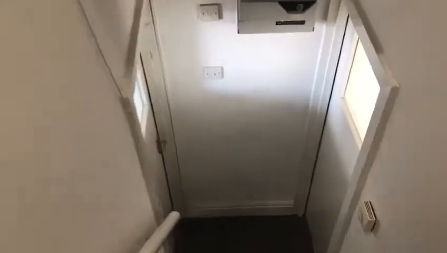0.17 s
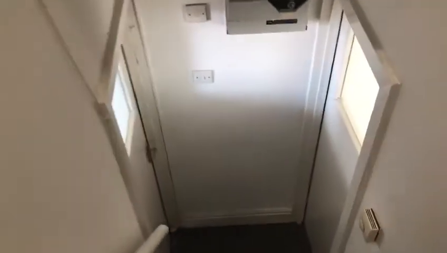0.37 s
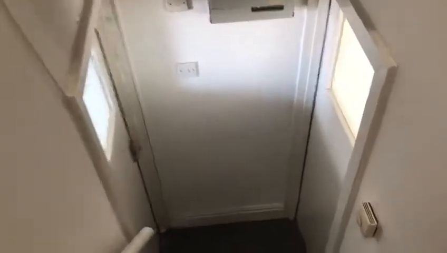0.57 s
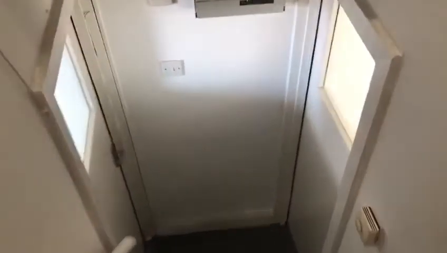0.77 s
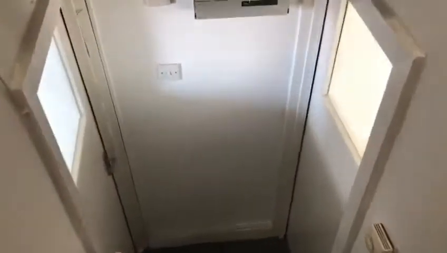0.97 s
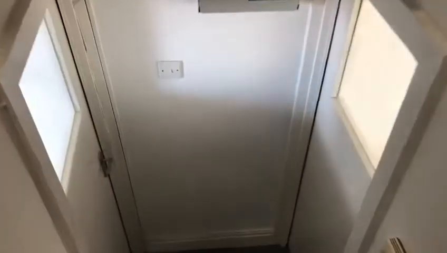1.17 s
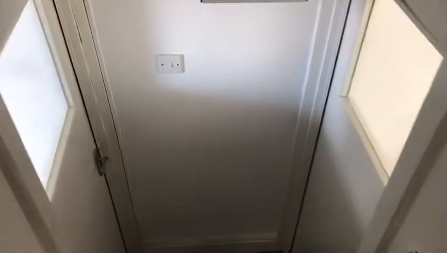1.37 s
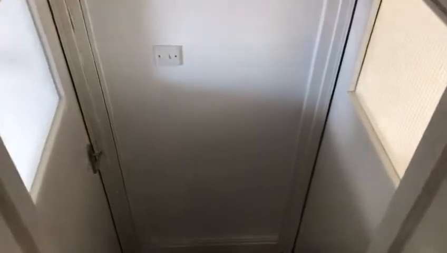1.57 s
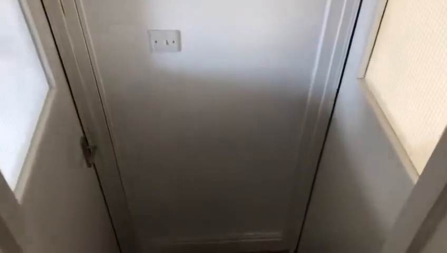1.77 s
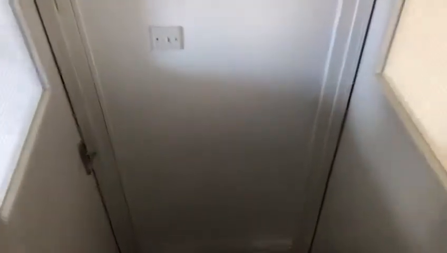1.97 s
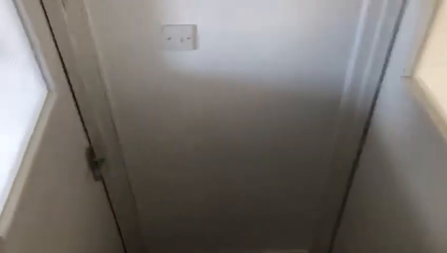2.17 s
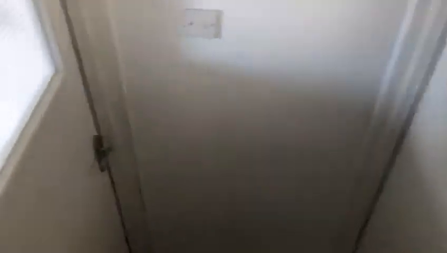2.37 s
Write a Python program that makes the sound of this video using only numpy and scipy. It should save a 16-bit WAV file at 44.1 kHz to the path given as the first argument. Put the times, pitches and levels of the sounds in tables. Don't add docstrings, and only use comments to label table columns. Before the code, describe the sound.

Someone walks down carpeted wooden stairs, dull uneven thuds and snapping treads in a tight stairwell

```python
import sys
import numpy as np
from scipy import signal
from scipy.fft import rfft, irfft
from scipy.io import wavfile
from scipy.ndimage import uniform_filter1d

SR = 44100
rng = np.random.default_rng(int(sys.argv[2]) if len(sys.argv) > 2 else 0)


def attenuation_scalar(level_db):
    decades = np.asarray(level_db, float) / 20
    return 10 ** decades


def transcribe(signal):
    frames = np.atleast_2d(signal).T
    limited = np.clip(frames, -1, 1)
    pcm = np.round(limited * 32767).astype(np.int16)
    wavfile.write(sys.argv[1], SR, pcm)


N = 106325

# (time [s], peak [dB], tread pitch [Hz],
# ring t60 [s])
TREAD_THUDS = [(0.136, -35.5, 247, 0.04), (0.145, -33, 239, 0.07), (0.17, -47, 199, 0.1),
               (0.196, -23.5, 114, 0.04), (0.215, -33, 198, 0.061), (0.2643, -18.5, 253, 0.053),
               (0.2769, -19, 213, 0.086), (0.499, -37.5, 216, 0.086), (0.742, -29.5, 306, 0.063),
               (0.75, -27.5, 221, 0.049), (0.819, -31, 144, 0.058), (0.886, -38.5, 170, 0.097),
               (1.222, -33.5, 161, 0.27), (1.319, -29, 143, 0.2), (1.371, -36, 170, 0.08),
               (1.792, -26, 295, 0.05), (1.842, -30, 158, 0.23), (1.966, -23, 260.6, 0.08),
               (2.169, -26.5, 229.7, 0.096), (2.38, -35.5, 231.6, 0.2),
               (0.016, -47, 203, 0.21), (0.336, -44, 182, 0.095), (0.44, -42.5, 273, 0.45),
          (0.664, -55.5, 156, 0.045), (0.707, -48, 146, 0.086), (0.916, -37, 183, 0.11),
          (0.968, -39.5, 272, 0.05), (1.001, -48, 150, 0.19), (1.042, -38, 216, 0.017),
          (1.246, -42.5, 158, 0.11), (1.535, -45.5, 147, 0.08), (1.27, -38, 240, 0.26),
          (1.41, -34.5, 248, 0.056), (1.44, -36.5, 240, 0.035), (1.488, -42, 227, 0.061),
          (1.892, -32.5, 295, 0.063), (1.916, -32.5, 155.5, 0.23), (2.021, -34.5, 325, 0.081),
          (2.056, -33.5, 264, 0.31), (2.202, -35, 202.4, 0.23), (2.287, -42, 176, 0.049)]
# (time [s], peak [dB], pitch [Hz], ring t60 [s])
KNOCKS = [(1.364, -30, 282, 0.037), (1.375, -21.5, 230, 0.031), (1.791, -26, 544, 0.031),
          (1.8, -34, 196, 0.062), (2.06, -28, 586, 0.025), (2.166, -27.5, 495, 0.06),
          (2.292, -42, 500, 0.042), (.441, -49, 506, 0.042), (1.968, -36, 487, .04)]
# (pitch [Hz], level [dB], t60 [s])
STAIR_MODES = [(145, -22, 0.75), (160.4, 2.5, 0.6), (202.4, -0.5, 0.52), (240, 1.5, 0.088),
               (291.5, 0.5, 0.069), (328, -27.5, 0.27)]
# (time [s], snap [dB], knock over snap [dB], tilt [dB per octave], burst [s])
CRACKS = [(0.186, -36, -2.5, -8, 0.0074), (0.2634, -37.5, 10.5, -36, 0.0075),
          (0.4911, -31, -24, -16, 0.0073), (0.7336, -35, 0.5, -17, 0.012), (0.7426, -25.5, -37, -9, 0.011),
          (0.8021, -32, -2, -16, 0.012), (0.8861, -35.5, 2.5, -20, 0.02),
          (1.2572, -29.5, -8.5, -11.5, 0.021), (1.3075, -28, -11, -15.5, 0.015),
          (1.3599, -25, -6.5, -13, 0.0066), (1.4042, -22.5, -8, -8, 0.0085),
          (1.791, -13.5, -11, -11, 0.0017), (1.795, -19, -25, -10.5, 0.0064),
          (1.8672, -26, -10, -12.5, 0.019), (1.89, -28, -3.5, -7.5, 0.018), (1.936, -26, -8, -15, 0.022),
          (1.9683, -23.5, -13, -14, 0.018), (2.0554, -16.5, -14.5, -11.5, 0.0045),
          (2.0587, -19.5, -8, -3, 0.0038), (2.065, -27, -21, -12.5, 0.017),
          (2.1639, -22.5, -10.5, -11, 0.0038), (2.1677, -27.5, -3, -10, 0.0083),
          (2.384, -35, -19, -12, 0.011)]
# (pitch [Hz], level [dB], t60 [s])
BOARD_MODES = [(450, 23, 0.052), (495, 25, 0.083), (574, 24.5, 0.04), (686, 23.5, 0.09), (755, 15, 0.033),
               (950, -9, 0.091), (1070, -16, 0.04), (1300, -42, 0.03), (1460, -24, 0.034), (1920, -5, 0.23)]
# (time [s], peak [dB], pitch [Hz], click [s])
TICKS = [(0.1495, -46.5, 2650, 0.0022), (0.2364, -43.5, 6350, 0.0024), (.4395, -55, 2380, 0.003),
         (.621, -58, 3020, 0.0018), (1.2213, -51.5, 2720, .006), (1.493, -55.5, 6550, .005),
         (1.6948, -54, 3000, 0.0018), (1.7822, -31.5, 5600, 0.0012), (1.79, -31.5, 1650, 0.0022),
         (2.0555, -27.5, 1850, 0.0031), (2.057, -29, 1300, 0.0043), (1.8294, -44, 9300, .001),
         (1.895, -55, 7100, 0.0016), (1.94, -50, 8260, 0.0025), (2.0078, -48.5, 8300, .002),
         (2.285, -52.5, 2120, 0.0055), (2.384, -42.5, 1600, .003)]
# (start [s], length [s], level [dB], tilt [dB per octave])
SCUFFS = [(0.171, 0.11, -51, -8.5), (0.229, 0.078, -40, -18.5), (0.279, 0.066, -57, -17),
          (0.48, 0.051, -49.5, -16), (.266, 0.042, -64, -16), (0.807, 0.053, -53, -6),
          (1.034, 0.032, -55.5, -13.5), (1.277, 0.051, -43, -19), (1.414, 0.02, -41.5, -7.5),
          (1.47, 0.052, -57, -8.5), (1.793, 0.065, -52.5, -4.5), (1.9, 0.015, -42, -40),
          (1.988, 0.067, -50.5, -7.5), (2.274, .04, -59.5, 8)]
# (time [s], level [dB], chatter [s], treble [dB])
RATTLES = [(.9605, -49.5, 0.016, -2), (1.030, -45, 0.0093, 0), (1.0775, -49, .014, 2),
           (1.1205, -52, 0.011, 3.5)]
# (pitch [Hz], level [dB], t60 [s])
ROD_MODES = [(740, 0, .03), (1507, -3, .03), (1890, -2, .025), (2400, -6, .008), (3430, -10, .008),
             (4300, -12, .006), (5520, -7, .008)]
# (time [s], peak [dB], pitch [Hz])
BOOMS = [(0.027, -54.5, 64.6), (0.15, -43, 40.2), (0.197, -36.5, 84), (0.209, -47, 36.3),
         (0.289, -40, 84.7), (0.328, -38.5, 58), (0.509, -47.5, 73.5), (0.761, -41.5, 61),
         (0.869, -40.5, 46.6), (1, -49.5, 50.5), (0.821, -44, 81), (1.269, -39, 47), (1.305, -43, 36),
         (1.401, -48, 60.6), (1.441, -36.5, 63), (1.84, -40, 45.2), (1.961, -42, 63), (2.011, -44, 35.7),
         (2.071, -54, 85), (2.17, -42.5, 61.6), (2.227, -44, 45), (2.392, -40, 60)]
# (frequency [Hz], t60 [s])
HALL_DECAY = [(120, 0.28), (330, 0.5), (870, 0.3), (2300, 0.18), (6060, 0.2), (11000, 0.085)]
# (frequency [Hz], level [dB per Hz])
HOUSE_COLOUR = [(20, -22.5), (50, 10), (100, -14), (170, 1.5), (400, -10.5), (1200, -19), (2200, -32)]
# (frequency [Hz], level [dB per Hz])
HISS_COLOUR = [(900, -30), (1500, -4), (4000, -9), (9500, -16.5), (11800, -26)]
# (time [s], level [dB])
STIR = [(0, -1), (.3, 0), (.85, -1), (.95, -3), (1.2, -3), (1.3, 0), (1.45, 0), (1.54, -4.5), (1.66, -3),
        (1.77, -4), (1.85, 0), (2.15, 0), (2.24, -4.5), (2.36, -4.5), (2.41, -2)]


def evened(x):
    return x / np.sqrt(np.mean(x ** 2) + 1e-20)


def peaked(x):
    return x / (abs(x).max() + 1e-20)


def read(points, hz):
    f, value = np.transpose(points)
    return np.interp(np.log(hz + 1), np.log(f + 1), value)


def add(mix, s, sound):
    part = mix[max(round(s * SR), 0):][:len(sound)]
    part += sound[:len(part)]


def ring(x, modes):
    t = np.arange(SR // 2) / SR
    body = np.zeros(len(t))
    for hz, db, t60 in modes:
        body += attenuation_scalar(db - 60 * t / np.clip(t60, 0.001, 0.15)) * np.sin(2 * np.pi * hz * t)
    return signal.fftconvolve(x, body)[:max(len(x), SR // 2)]


def tilted(x, db_per_oct, low_hz):
    hz = np.fft.rfftfreq(len(x), 1 / SR) + 1
    slope = attenuation_scalar(db_per_oct * np.log2(hz / 2000))
    return irfft(rfft(x) * slope / (1 + (low_hz / hz) ** 4), len(x))


def grit(size):
    noise = rng.standard_normal(size)
    grains_db = 3.5 * uniform_filter1d(rng.exponential(1, size), size=12)
    return noise * attenuation_scalar(grains_db)


def thuds():
    push_s, shudder_s, shudder_db, rise_s = 0.0026, 0.03, -3.5, 0.0033
    twin, twin_db = 0.869, -16
    stair_db, pile_db = -11.5, -24.5
    treads, blows, pile, t = np.zeros(N), np.zeros(N), np.zeros(N), np.arange(4096) / SR
    for s, db, hz, t60 in TREAD_THUDS + KNOCKS:
        noise = rng.standard_normal(len(t))
        push = np.sin(np.pi * np.minimum(t / push_s, 1)) ** 2
        shudder = noise * np.exp(-t / min(shudder_s, 6 / hz)) / np.sqrt(shudder_s * SR)
        blow = push / push.sum() + attenuation_scalar(shudder_db) * shudder
        blow = uniform_filter1d(blow, size=40)
        add(blows, s, attenuation_scalar(db) * blow)

        tread = ring(blow, [(hz, 0, t60), (hz * twin, twin_db, t60)])
        rise = 1 - np.exp(-np.arange(len(tread)) / SR / rise_s)
        add(treads, s, attenuation_scalar(db) * peaked(tread * rise))

        fibres = evened(tilted(noise, -8.0, low_hz=358))
        press = np.minimum(t / rise_s, 1) * np.exp(-t / shudder_s)
        add(pile, s, attenuation_scalar(db + pile_db) * fibres * press)
    cut = signal.butter(6, 124.6, "high", fs=SR, output="sos")
    return signal.sosfilt(cut, treads + attenuation_scalar(stair_db) * ring(blows, STAIR_MODES) + pile)


def cracks():
    rise_s, soft_rise = 0.00071, 0.22
    out, t = np.zeros(N), np.arange(4096) / SR
    cut = signal.butter(2, 350, "high", fs=SR, output="sos")
    for s, db, knock_db, tilt_db, burst in CRACKS:
        shape = np.minimum(t / (rise_s + soft_rise * burst), 1) * np.exp(-t / burst)
        snap = tilted(grit(len(t)), tilt_db, low_hz=1217) * shape
        add(out, s, attenuation_scalar(db - 7.5) * peaked(snap))

        modes = []
        for hz, level, t60 in BOARD_MODES:
            lean = rng.normal(0, 1.8)
            modes.append((hz * (1 + 0.03 * lean), level + lean, min(t60, 0.03)))
        knock = ring(grit(len(t)) * shape ** 2.02, modes)
        add(out, s, attenuation_scalar(db + knock_db) * peaked(signal.sosfilt(cut, knock)))
    return out


def ticks():
    out, t = np.zeros(N), np.arange(4096) / SR
    for s, db, hz, length in TICKS:
        click = tilted(rng.standard_normal(len(t)), -5.5, low_hz=0.68 * hz) * np.exp(-t / length)
        tone = ring(click, [(hz, 0, 5 / hz)])
        add(out, s, attenuation_scalar(db) * peaked(tone))
        add(out, s, attenuation_scalar(db - 5) * peaked(click))
    return out


def scuffs():
    out, t = np.zeros(N), np.arange(4096) / SR
    for s, length, db, tilt_db in SCUFFS:
        arch = np.sin(np.pi * np.minimum(t / length, 1))
        add(out, s, attenuation_scalar(db) * evened(tilted(grit(len(t)), tilt_db, low_hz=500)) * arch)
    return out


def rattles():
    out, t = np.zeros(N), np.arange(2048) / SR
    for s, db, length, treble_db in RATTLES:
        chatter = grit(len(t)) * np.minimum(t / 0.00044, 1) * np.exp(-(t / length) ** 2)
        modes = [(hz, level + treble_db * (hz > 2000), t60) for hz, level, t60 in ROD_MODES]
        add(out, s, attenuation_scalar(db) * peaked(ring(chatter, modes)))
        add(out, s, attenuation_scalar(db + treble_db - 3) * peaked(tilted(chatter, -5, low_hz=1020)))
    return out


def booms():
    rise_s, t60_s = 0.0063, 0.27
    out, t = np.zeros(N), np.arange(SR // 2) / SR
    swell = (1 - np.exp(-(t / rise_s) ** 2)) * attenuation_scalar(-60 * t / t60_s)
    for s, db, hz in BOOMS:
        tone = np.sin(2 * np.pi * (hz * t + rng.random()))
        add(out, s, attenuation_scalar(db) * peaked(swell * tone))
    return out


def hall(x):
    out, slots = np.zeros(N), np.arange(120, SR // 2 - 20, 20)
    for k in range(3):
        taps = np.zeros(SR // 2)
        signs = rng.choice([-1., 1.], len(slots))
        taps[slots + rng.integers(0, 20, len(slots))] = signs
        hz, t, z = signal.stft(taps, SR, nperseg=256)
        decay = attenuation_scalar(-60 * t / read(HALL_DECAY, hz)[:, None])
        tail = signal.istft(z * decay, SR, nperseg=256)[1]
        turn = np.sqrt(2 / 3) * np.cos(2 * np.pi * (23 * np.arange(N) / SR + k / 3))
        out += signal.fftconvolve(x * turn, tail / np.linalg.norm(tail))[:N]
    return out


def air(colour, db):
    patchy_db, swell_db = 1.2, 1.1
    frames, hz = N // 256 + 5, np.fft.rfftfreq(1024, 1 / SR)
    a, b, patches = rng.standard_normal((frames, 513, 3)).T
    patches = uniform_filter1d(patches, size=12, axis=0)
    patches = evened(uniform_filter1d(patches, size=14, axis=1))
    swell = evened(uniform_filter1d(rng.standard_normal(frames), size=30))
    level_db = read(colour, hz)[:, None] + patchy_db * patches + swell_db * swell
    noise = signal.istft((a + 1j * b) * attenuation_scalar(level_db), nperseg=1024, noverlap=768)[1][:N]
    return attenuation_scalar(db) * evened(noise)


def scene():
    low = thuds()
    high = cracks() + ticks() + scuffs() + rattles()
    sheen = signal.lfilter(*signal.iirpeak(6000, 1.48, fs=SR), high)
    high = high + attenuation_scalar(-5.5) * sheen
    frame = booms()
    tail = hall(attenuation_scalar(-11.5) * low + attenuation_scalar(-7) * high)
    stir = attenuation_scalar(np.interp(np.arange(N) / SR, *np.transpose(STIR)))
    floor = stir * (air(HOUSE_COLOUR, -54.5) + air(HISS_COLOUR, -69.5))
    return (low + high + frame + tail + floor)[None]


def roll_off(x):
    return signal.sosfilt(signal.butter(12, 12490, fs=SR, output="sos"), x)


def record(dry):
    edge = signal.firwin(127, 11850, fs=SR)
    mix = signal.oaconvolve(dry, edge[None], "same")
    return roll_off(mix)


dry = scene()
out = record(dry)
transcribe(out)
```